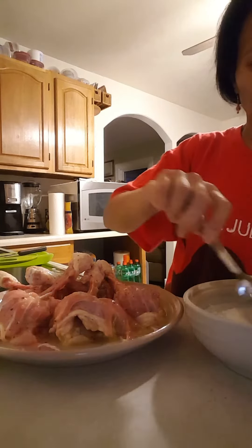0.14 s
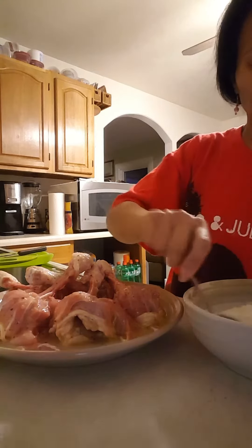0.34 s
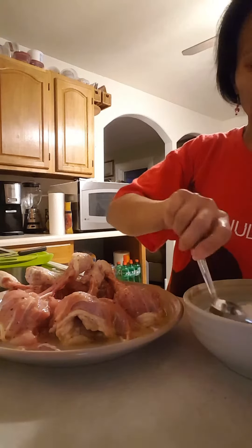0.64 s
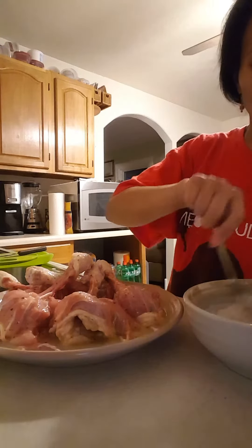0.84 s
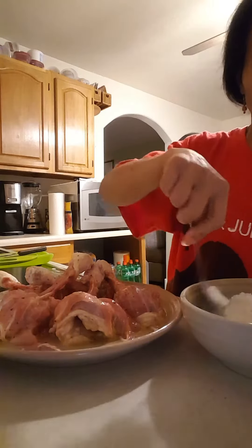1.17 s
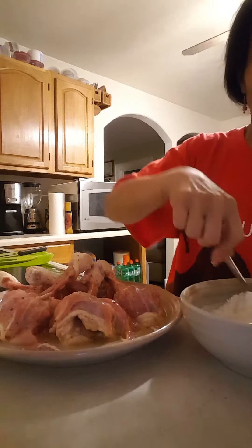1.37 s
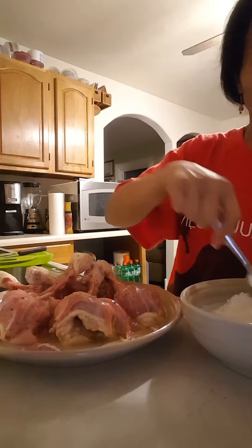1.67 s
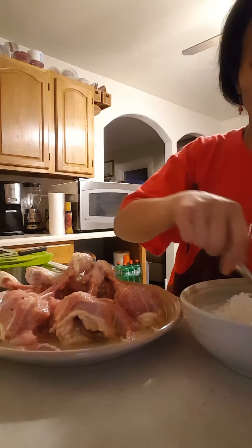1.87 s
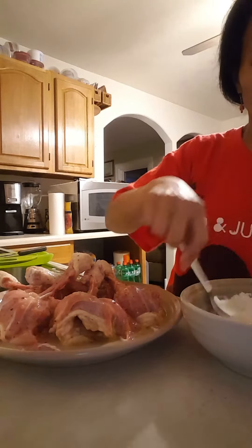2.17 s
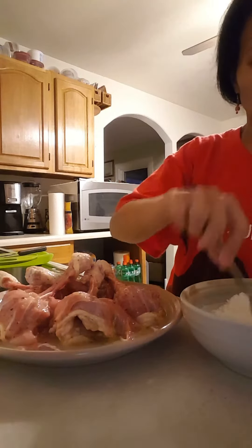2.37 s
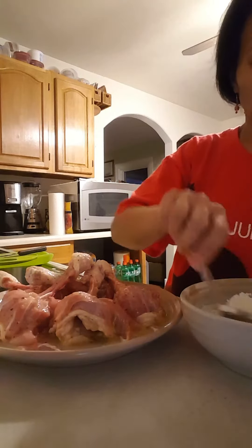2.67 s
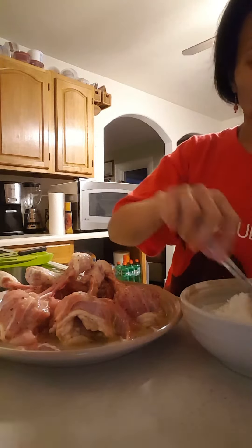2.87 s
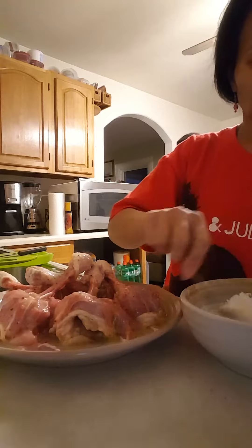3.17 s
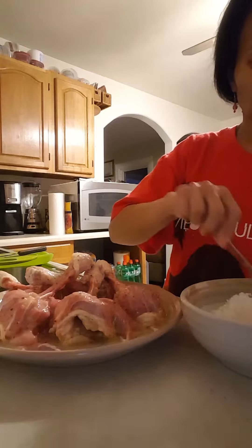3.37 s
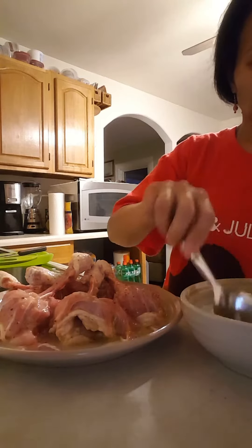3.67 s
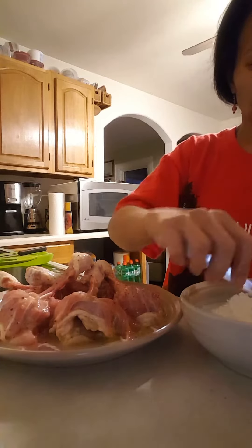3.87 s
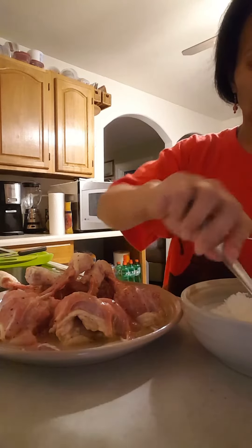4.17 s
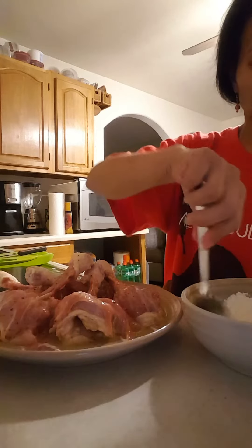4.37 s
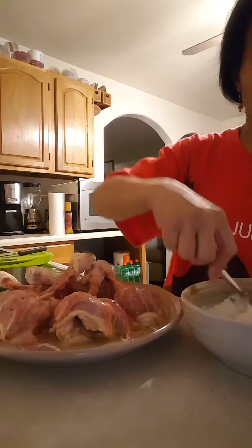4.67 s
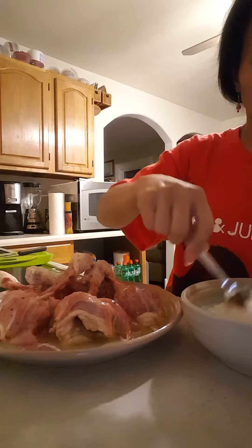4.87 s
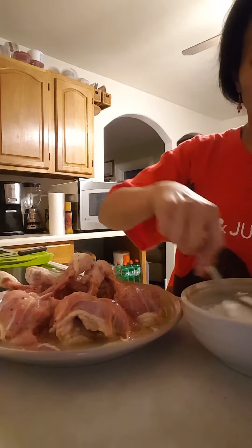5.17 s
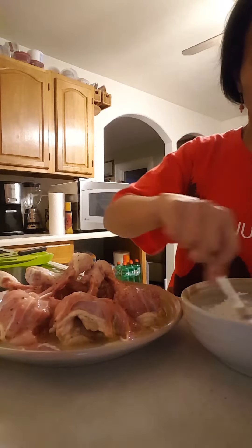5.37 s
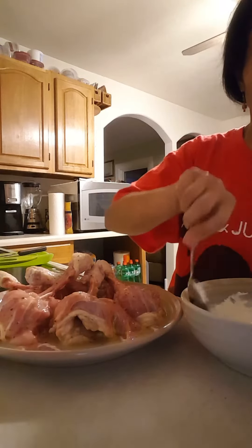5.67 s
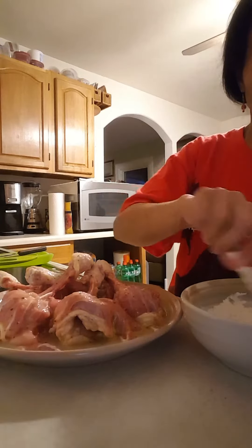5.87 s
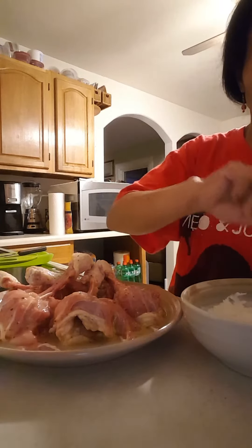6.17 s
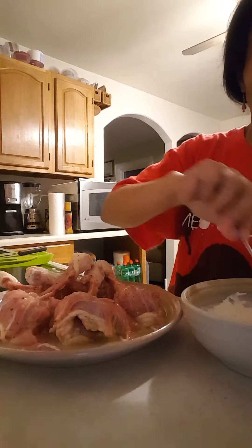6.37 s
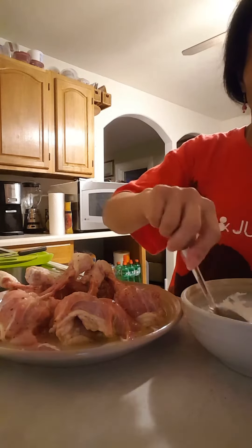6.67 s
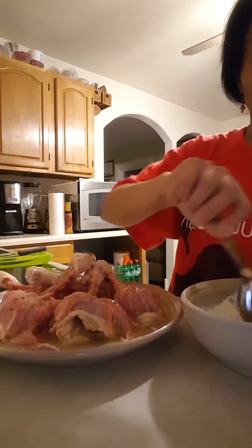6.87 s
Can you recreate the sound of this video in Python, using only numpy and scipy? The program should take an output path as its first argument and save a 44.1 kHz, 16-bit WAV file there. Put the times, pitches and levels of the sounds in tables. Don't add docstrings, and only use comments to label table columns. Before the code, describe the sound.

Brisk hand stirring in a bowl on a kitchen counter: low thuds from the bowl's foot, short ceramic pings from the spoon, and dry, crunchy scraping after each hit. Strokes come irregularly for seven seconds, some hard and ringing, others soft and grainy. The phone microphone lies close by on the counter, with the bowl leaning right, little room echo and a quiet low hum.

```python
import sys
import numpy as np
from scipy import signal
from scipy.fft import rfft, irfft, next_fast_len
from scipy.io import wavfile
from scipy.ndimage import uniform_filter1d, map_coordinates

SR = 44100
rng = np.random.default_rng(int(sys.argv[2]) if len(sys.argv) > 2 else 0)


def natural_amplitude(level_db):
    exponent = np.asarray(level_db, float) / 20
    return 10 ** exponent


def dump(signal):
    limited = np.clip(np.atleast_2d(signal).T, -1, 1)
    pcm = np.round(limited * 32767).astype(np.int16)
    wavfile.write(sys.argv[1], SR, pcm)


N = 310464

# frequency in Hz, density in dB per Hz.
AIR = [(20, -40.5), (45, -15.5), (190, -8.5), (1100, -26), (4000, -38), (9000, -53), (15600, -41.5),
       (15900, -75.5)]
AIR_DB = -54
# frequency in Hz, correlation from -1 to 1.
AIR_ALIKE = [(60, 0.96), (180, 0.99), (550, 0.89), (1650, -0.25), (4970, -0.4), (15000, -0.73)]
# frequency in Hz, left over right in dB.
AIR_PAN = [(60, 0), (180, -1), (550, -3.5), (1650, -4), (4970, -2.5), (15000, 1)]
# frequency in Hz, level in dB, width in Hz.
HUM = [(59, -67.5, 4), (149, -58, 20), (243.3, -56.5, 11.62)]
# frequency in Hz, 60 dB decay time in seconds.
KITCHEN = [(200, 0.25), (2000, 0.33), (10000, .12)]
# frequency in Hz, left over right in dB.
NEAR_PAN = [(200, 3), (400, -9), (700, -10.5), (1300, -3.5), (2400, -3.5), (4400, -8.5), (8000, -3),
            (15000, -3.5)]

# frequency in Hz, 60 dB decay time in seconds, level in dB, left over right in dB, left lead in rad.
COUNTER = [(279, 0.033, -12, 2.5, -.2), (405, 0.019, 1.5, -11.5, 0.61), (529.4, 0.017, -5, -7, -2.3),
           (624.5, 0.025, -7.5, -6.5, -1.2)]
# frequency in Hz, left over right in dB, left lead in rad, level column (index).
BOWL = [(1317, -6, -.7, 0), (3226, -8, -.4, 1), (5655, -14, 2.4, 2), (8538, -9, -.4, 3), (10720, 2, .3, 4),
        (11836, -1, -.2, 4), (12778, 3, -1.8, 4), (15475, 1, 1.8, 4)]
# 60 dB decay time in seconds, level in dB.
RING_OUT = [(0.15, -0.5), (0.2, 0), (0.1, -3.5), (0.11, -1.5), (.07, -2), (0.11, -5), (0.24, -2.5),
            (.07, 0.5)]
# frequency in Hz, width in Hz, level in dB.
SPOON = [(1059, 92, 4), (1617, 186, -2.5)]
# frequency in Hz, width in Hz, level in dB.
GRIT = [(2695, 210, 5), (3252, 280, 1), (4330, 750, -6.5), (5490, 460, -8.5), (6400, 890, -19.5),
        (7650, 580, -17), (8090, 1300, -17.5), (9090, 460, -27), (10750, 860, -9.5), (12390, 1700, -28),
        (12960, 430, -21.5), (14800, 790, -19)]

# time in seconds, peak in dB, rim wobble in dB, snap in dB, tick in dB.
BLOWS = [(0.342, -8.5, -5.5, -19, -19), (0.717, -5, -14, -8, -21), (1.117, -11, -8, -11, -28),
         (1.827, -26.5, -24.5, -5, -35), (2.177, -13, -15.5, -6, -11), (2.726, -23, 1, -14.5, -30.5),
         (3.088, -10, 3, -11, -20.5), (3.496, -12.5, -28.5, -3, -45.5), (3.817, -6, -14, -17.5, -56.5),
         (4.215, -10.5, -5.5, -8, -28), (5.068, -31, -4, -23, -30.5), (5.76, -11, -16, -27, -20),
         (6.314, -23, -30, -10.5, -24.5), (6.635, -9, -17, -11, -37), (7.024, -7.5, -6.5, -16, -24.5)]
# time in seconds, peak in dB, snap in dB, tick in dB.
BUMPS = [(0.112, -19.5, -10, -53), (0.379, -11, -18, -51), (0.827, -25, -8, -22),
         (0.872, -41.5, 18.5, -23.5), (1.194, -24, -8, -22.5), (1.413, -30, -21.5, -25),
         (1.431, -36, 11.5, -25), (1.937, -22.5, -5.5, -68), (2.225, -13.5, -4, -27),
         (2.25, -24.5, -6, -42), (2.89, -20.5, -2, -47), (3.157, -10.5, -12, -34), (4.022, -26, -9, -44.5),
         (4.524, -41.5, 9, -8), (4.774, -32, 11, -21), (5.817, -25.5, -22.5, -34), (6.604, -61, -2, -17),
         (6.878, -50.5, -17, -13)]
BUMP_RIM_DB, BUMP_RIM_PER_SNAP = -18.5, -.8
# time in seconds, then the levels of modes 1, 2, 3 and 4 in dB.
STRIKES = [(0.344, -17, -26, -19, -28.5), (0.383, -32, -23.5, -31.5, -40), (0.717, -19.5, -56, -34, -59.5),
           (1.119, -10.5, -20.5, -39, -36), (1.196, -20, -33.5, -41, -40), (1.252, -35, -34.5, -25, -33),
           (1.293, -27, -28, -28, -28.5), (2.178, -12.5, -14.5, -11.5, -24),
           (2.198, -27, -28.5, -38, -32.5), (2.226, -26.5, -27, -31.5, -25),
           (3.089, -18.5, -24.5, -23.5, -25), (3.494, -30, -23, -37.5, -49),
           (4.216, -11, -25.5, -37, -34.5), (4.237, -22, -27, -50, -31.5), (4.524, -32, -48, -31, -43),
           (4.566, -39, -35.5, -32, -39.5), (5.763, -17.5, -32, -25, -34.5),
           (7.026, -12.5, -28.5, -23.5, -34)]
# time in seconds, then the levels of mode 1, mode 2 and the upper modes in dB.
TOUCHES = [(0.003, -53, -74, -58), (0.082, -43, -49.5, -45), (0.824, -32, -43, -60), (1.338, -60, -52, -41),
           (1.393, -61, -47.5, -38.5), (2.32, -64, -41.5, -58), (3.158, -28, -39.5, -64),
           (3.817, -31.5, -55.5, -54), (3.84, -45, -64, -55), (6.665, -47, -64, -60),
           (0.76, -39.5, -55, -51), (3.964, -55.5, -41.5, -65), (5.786, -57, -48.5, -41),
           (5.88, -55, -70, -72), (6.636, -27.5, -63, -40.5)]
TOUCH_FOURTH_DB, TOP_DB, TOP_GROWS = -9.5, -0.5, 1.29

# start in seconds, lift in seconds, bowl rumble in dB, spoon scrape in dB, edge grit in dB.
STROKES = [(0.002, 0.132, -44.5, -52, -71), (0.356, 0.492, -48.5, -46, -48.5),
           (0.716, 0.898, -59, -45.5, -45.5), (1.04, 1.13, -42, -45.5, -59), (1.118, 1.496, -45, -66, -52),
           (1.84, 1.948, -49, -42.5, -54.5), (2.171, 2.448, -56.5, -58, -53.5),
           (2.743, 2.901, -46, -48.5, -45.5), (3.102, 3.273, -44, -50.5, -48),
           (3.494, 3.588, -41, -50, -51), (3.854, 4.032, -47.5, -60, -59.5),
           (4.224, 4.769, -49.5, -52, -49), (5.066, 5.546, -57, -68.5, -57),
           (5.767, 6.076, -42.5, -64, -65.5), (6.316, 6.418, -43.5, -48.5, -58.5),
           (6.639, 6.826, -45, -47.5, -52.5), (7.029, 7.103, -43, -42, -38)]
# time in seconds, bowl rumble in dB, spoon scrape in dB, edge grit in dB.
PUSHES = [(0.005, -44, -40.5, -39), (0.049, -52.5, -44, -45), (.85, -39.5, -40, -50.5),
          (.9, -66.5, -39, -47), (1.244, -45, -40, -43.5), (1.298, -37, -42, -39.5),
          (1.42, -39.5, -67, -52.5), (1.491, -62, -48, -49), (1.841, -66, -49, -39),
          (2.248, -35, -39, -41.5), (2.328, -58.5, -33.5, -43.5), (2.399, -62, -40, -54.5),
          (2.772, -41, -57.5, -47), (2.889, -39, -39.5, -55.5), (3.16, -37.5, -50.5, -75),
          (3.88, -39, -49, -48.5), (3.934, -49.5, -34.5, -39), (3.98, -72.5, -42, -89),
          (4.35, -40.5, -52.5, -60.5), (4.458, -38, -43.5, -45.5), (4.532, -60, -40, -37),
          (4.562, -36, -31.5, -37.5), (4.67, -66, -38.5, -53), (5.07, -43.5, -56.5, -49.5),
          (5.232, -68, -48, -54), (5.383, -63, -37.5, -42.5), (5.47, -58, -46.5, -52),
          (5.91, -45.5, -46, -42.5), (5.998, -39.5, -40, -54.5), (6.775, -44, -44.5, -46.5)]
TOUCH_DB_PER_S, LIFT_DB_PER_S = 7006, 1205.5
EASE_IN_DB_PER_S = 706
SAG_DB = -3
PUSH_RISE_DB_PER_S, PUSH_FALL_DB_PER_S = 338, 231.5
SHAKE_DB, SHAKE_PER_TICK, SHAKE_DB_PER_S = -12.5, 0.3, 331
SPRAY_DB, SPRAY_DB_PER_S = -14.5, 137
SING_DB = -10.5


def unit(x):
    return x / np.sqrt(np.mean(x ** 2) + 1e-20)


def along(points, hz):
    f, v = np.transpose(points)
    return np.interp(np.log(hz + 1), np.log(f + 1), v)


def wobble(rate):
    knots = rng.standard_normal(int(N * rate / SR) + 4)
    return map_coordinates(knots, [np.arange(N) * rate / SR])


def filtered(x, response):
    m = next_fast_len(N + SR // 2)
    return irfft(rfft(x, m) * response(np.fft.rfftfreq(m, 1 / SR)), m)[..., :N]


def resonances(modes, sign=-1):
    def response(f):
        return sum(sign ** k * natural_amplitude(db) * 1j * f * width / (hz * hz - f * f + 1j * f * width)
                   for k, (hz, width, db) in enumerate(modes))
    return response


def sides(pan_db, lead=0.):
    return np.array([natural_amplitude(pan_db / 2) * np.exp(1j * lead), natural_amplitude(-pan_db / 2) + 0j])


def pair(x, alike, pan):
    def mixing(hz):
        angle = np.arccos(np.clip(along(alike, hz), -1, 1)) / 2
        return np.array([np.cos(angle), np.sin(angle)])
    mid, side = filtered(x, mixing)
    return filtered(np.array([mid + side, mid - side]), lambda hz: sides(along(pan, hz)))


def decay(t, hz, t60, attack):
    envelope = natural_amplitude(-60 * t / t60) + 0.007 * natural_amplitude(-20 * t / t60)
    return envelope * (1 - np.exp(-t / attack)) * np.exp(2j * np.pi * hz * t)


def room_tone():
    air = unit(filtered(rng.standard_normal((2, N)), lambda hz: natural_amplitude(along(AIR, hz))))
    hum = sum(natural_amplitude(db) * unit(filtered(rng.standard_normal(N), resonances([(hz, width, 0)])))
              for hz, db, width in HUM)
    return natural_amplitude(AIR_DB + 0.76 * wobble(1.3)) * pair(air, AIR_ALIKE, AIR_PAN) + hum


def kitchen(x):
    hz, t, z = signal.stft(rng.standard_normal((2, SR // 2)), SR, nperseg=256)
    fading = natural_amplitude(-60 * t / along(KITCHEN, hz)[:, None])
    tail = signal.istft(z * fading, SR, nperseg=256)[1]
    delayed = np.pad(x, ((0, 0), (300, 0)))
    return signal.fftconvolve(delayed, tail / np.linalg.norm(tail[0]), axes=1)[:, :N]


def contacts():
    bumps = [(s, db, BUMP_RIM_DB + BUMP_RIM_PER_SNAP * snap, snap, tick) for s, db, snap, tick in BUMPS]
    return sorted(BLOWS + bumps)


def knocks():
    out, bursts = np.zeros((2, N + SR)), np.zeros((2, 2, N + SR))
    t = np.arange(SR // 6) / SR
    rim = sides(-7.5, -.6)[:, None] * decay(t, 446, 0.071, .0015)
    fading = natural_amplitude(-60 * t / .02) + .35 * natural_amplitude(-60 * t / .045)
    for s, db, rim_db, snap_db, tick_db in contacts():
        at = round((s + .0024) * SR)
        luck = rng.standard_normal((3, len(COUNTER)))
        body = sum(natural_amplitude(level + 2 * a) * sides(pan + b, lead)[:, None] * decay(t, hz * (1 + 0.036 * c), t60, 0.00094)
                   for (hz, t60, level, pan, lead), a, b, c in zip(COUNTER, *luck))
        out[:, at:at + len(t)] -= natural_amplitude(db) * (body + natural_amplitude(rim_db) * rim).imag
        burst = rng.standard_normal((2, 2, len(t))) * fading
        burst[0, 0, 0] = -4.0
        gains = natural_amplitude(db + 8.5 + np.array([snap_db, tick_db]))
        bursts[..., at:at + len(t)] += gains[:, None, None] * burst

    def tick_response(hz):
        return natural_amplitude(3.5) * np.sqrt(hz / 1500) / (1 + (hz / 13000) ** 4) * resonances(GRIT, sign=1)(hz)
    snap = filtered(bursts[0, :, :N], resonances([(1000, 500, 2.0), (1540, 472, 2.5), (2737, 680, -12.5)]))
    tick = filtered(bursts[1, :, :N], tick_response)
    return out[:, :N] + pair(snap + tick, [(1000, 0.61), (8000, 0.28)], NEAR_PAN)


def ring_levels():
    rows = sorted(STRIKES + [(*row, row[3] + TOUCH_FOURTH_DB) for row in TOUCHES])
    return [(*row, TOP_DB + TOP_GROWS * (row[3] + row[4]) / 2) for row in rows]


def rings():
    out = np.zeros((2, N + SR))
    rows = ring_levels()
    free = [decay(np.arange(SR // 3) / SR, hz, t60, 0.00061) for (hz, *_), (t60, _) in zip(BOWL, RING_OUT)]
    stops = [row[0] for row in rows[1:]] + [99]
    for (s, *levels), stop in zip(rows, stops):
        t = np.arange(int(SR * min(stop - s + 1 / 20, 1 / 3))) / SR
        luck = rng.standard_normal((len(BOWL), 2))
        chatter = [np.interp(t * 90, np.arange(len(knots)), natural_amplitude(hz / 2600 * knots))
                   for (hz, *_), knots in zip(BOWL, rng.standard_normal((len(BOWL), 60)))]
        ring = sum(natural_amplitude(levels[col] + db) * sides(pan + 0.5 * a, lead + 0.3 * b)[:, None] * (shake * mode[:len(t)])
                   for (hz, pan, lead, col), (_, db), (a, b), shake, mode
                   in zip(BOWL, RING_OUT, luck, chatter, free))
        held = natural_amplitude(-60 * np.clip(t - (stop - s), 0, None) / 0.0035)
        out[:, round(s * SR):round(s * SR) + len(t)] += ring.imag * held
    return out[:, :N]


def total(gains):
    return np.sqrt(np.sum(gains ** 2, axis=0))


def stroke_gains():
    t = np.arange(0, N / SR + 1 / 500, 1 / 500)
    start, lift, *drag = np.transpose(STROKES)[..., None]
    hit, peak, _, _, tick = np.transpose(BLOWS)[..., None]
    opened_by_blow = abs(start - hit.T).min(axis=1, keepdims=True) < 1 / 50
    closing = np.where(opened_by_blow, TOUCH_DB_PER_S, EASE_IN_DB_PER_S)
    contact = natural_amplitude(-closing * np.clip(start - t, 0, None) - LIFT_DB_PER_S * np.clip(t - lift, 0, None))
    touching = total(contact).clip(0, 1)
    tired = SAG_DB * ((t - start) / (lift - start)).clip(0, 1)
    at, *push = np.transpose(PUSHES)[..., None]
    swell = -PUSH_RISE_DB_PER_S * np.clip(at - t, 0, None) - PUSH_FALL_DB_PER_S * np.clip(t - at, 0, None)
    rumble, scrape, grit = [np.hypot(total(contact * natural_amplitude(d + tired)), touching * total(natural_amplitude(p + swell)))
                            for d, p in zip(drag, push)]
    since = np.where(t > hit, t - hit, np.inf)
    shake = touching * total(natural_amplitude(peak + SHAKE_DB + SHAKE_PER_TICK * tick - SHAKE_DB_PER_S * since))
    spray = touching * total(natural_amplitude(peak + tick + SPRAY_DB - SPRAY_DB_PER_S * since))
    sing = natural_amplitude(SING_DB) * np.sqrt(grit * rumble)
    gains = np.hypot(rumble, shake), scrape, np.hypot(grit, spray), sing
    return [np.interp(np.arange(N) / SR, t, g) for g in gains]


def crumbs(rate, spread_db, lumpy_db):
    happens = rng.random((2, N)) < rate / SR
    size = rng.standard_normal((2, N)) * natural_amplitude(spread_db * rng.exponential(1, (2, N)))
    return happens * size * natural_amplitude(lumpy_db * wobble(70))


def patchy(x, depth_db, size):
    z = signal.stft(x, nperseg=size)[2]
    field = uniform_filter1d(rng.standard_normal(z.shape[1:]), size=3, axis=0)
    field = uniform_filter1d(field, size=6144 // size, axis=1)
    gain = natural_amplitude(depth_db * unit(field) - depth_db ** 2 * np.log(10) / 20)
    return signal.istft(z * gain, nperseg=size)[1][:, :N]


def strokes():
    rumble, scrape, grit, sing = stroke_gains()
    foot = resonances([(268.6, 60, -2.0), (442.3, 43.0, 2.5), (700, 260, -9.5)])
    modes = resonances([(hz, 25, db - hz / 1500) for (hz, *_), (_, db) in zip(BOWL, RING_OUT)])
    layers = [(rumble, crumbs(5000, 1.1, 1.5), foot),
              (scrape, crumbs(6000, 1.1, 1.6), resonances(SPOON)),
              (grit, crumbs(10000, 1.6, 1.8), resonances(GRIT, sign=1)),
              (sing, crumbs(4000, 1.5, 3), modes)]
    hz = np.linspace(0, SR / 2, num=8192)
    scraping = sum(filtered(gain * unit(x), shape) / np.linalg.norm(shape(hz)) * np.sqrt(len(hz))
                   for gain, x, shape in layers)
    scraping = patchy(scraping, depth_db=4.5, size=256)
    scraping = patchy(scraping, depth_db=2.5, size=1024)
    return pair(natural_amplitude(2.0) * scraping, [(400, 0.8), (1500, 0.22), (5000, 0.25), (14000, 0.25)], NEAR_PAN)


def scene():
    bowl = knocks() + rings() + strokes()
    bowl = filtered(bowl, lambda hz: (1j * hz / (120 + 1j * hz)) ** 3)
    return bowl + natural_amplitude(-15.0) * kitchen(bowl) + room_tone()


def band_limit(x):
    return signal.sosfilt(signal.butter(12, 16520, fs=SR, output="sos"), x)


def record(dry):
    closed = filtered(np.clip(dry, -1, 1), lambda hz: np.where(hz < 15850, 1, natural_amplitude(-45)))
    return band_limit(closed)


dry = scene()
out = record(dry)
dump(out)
```